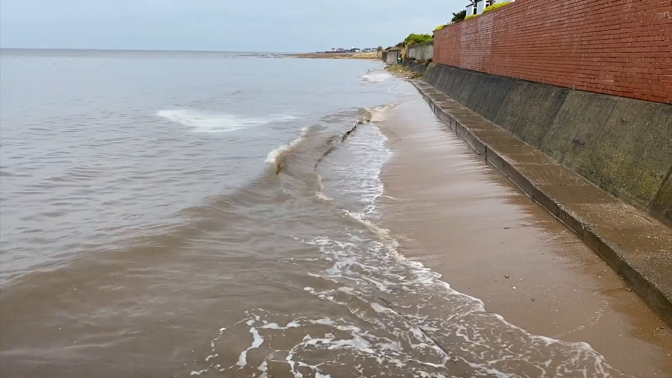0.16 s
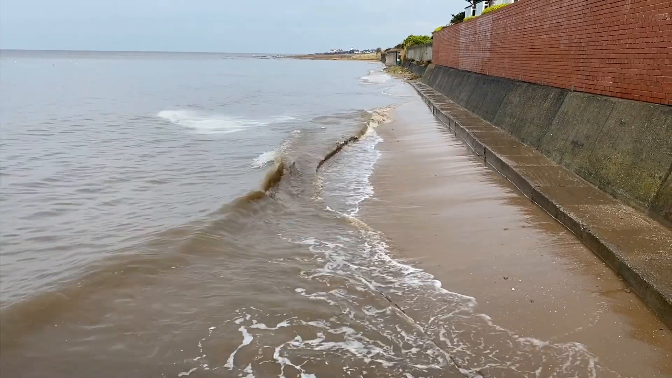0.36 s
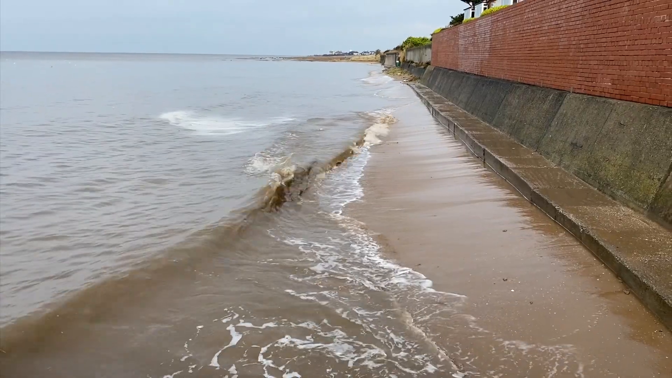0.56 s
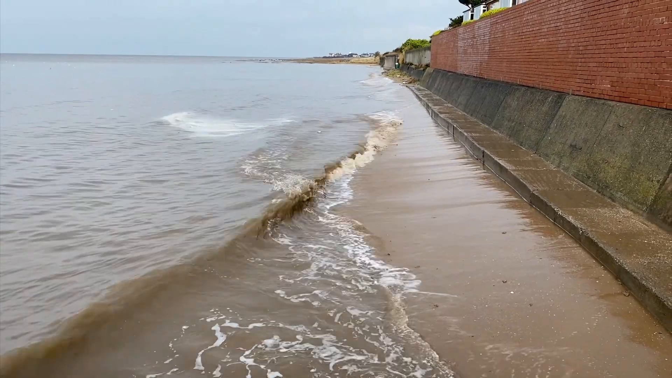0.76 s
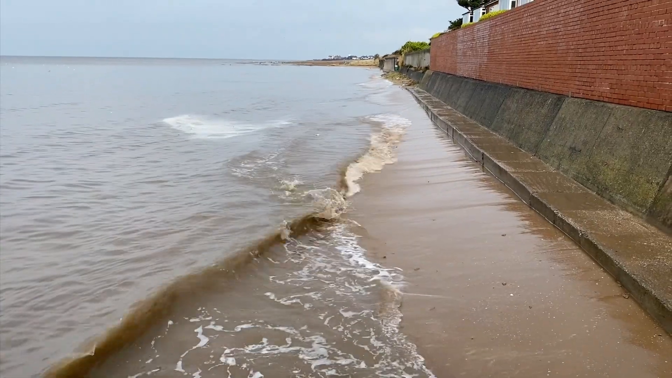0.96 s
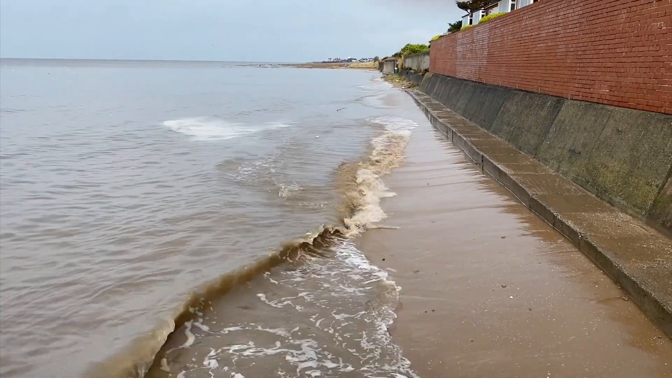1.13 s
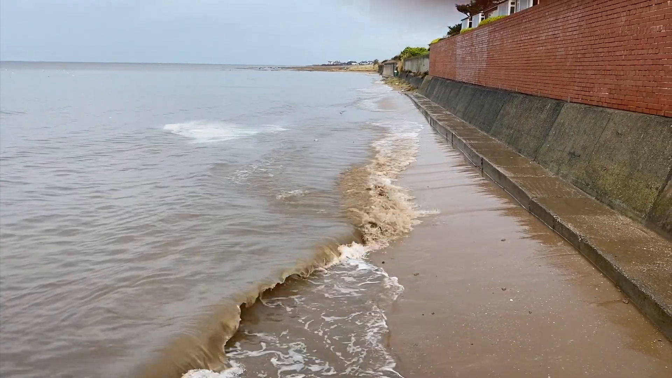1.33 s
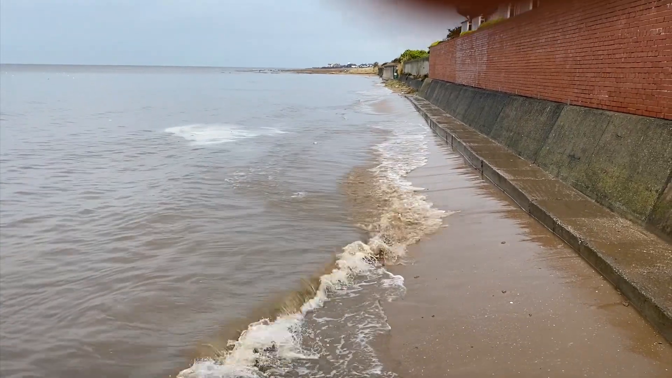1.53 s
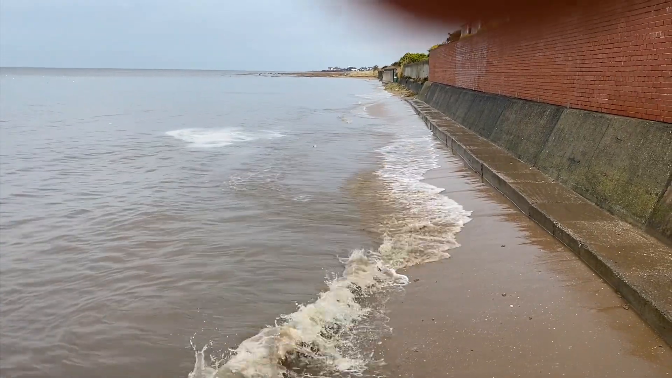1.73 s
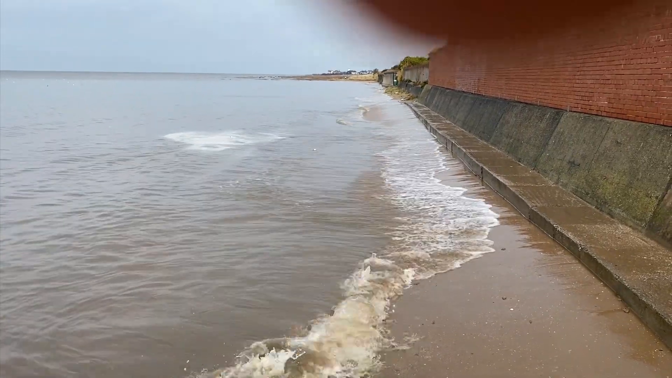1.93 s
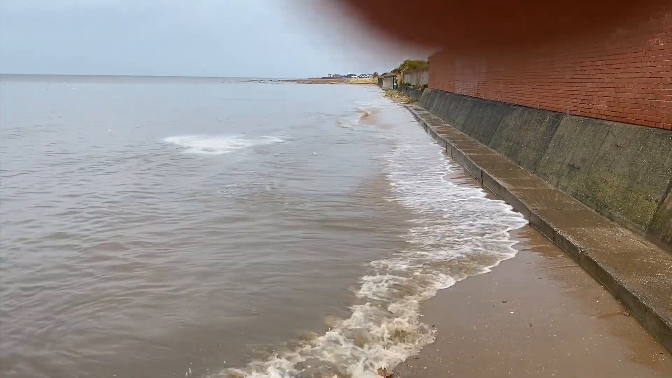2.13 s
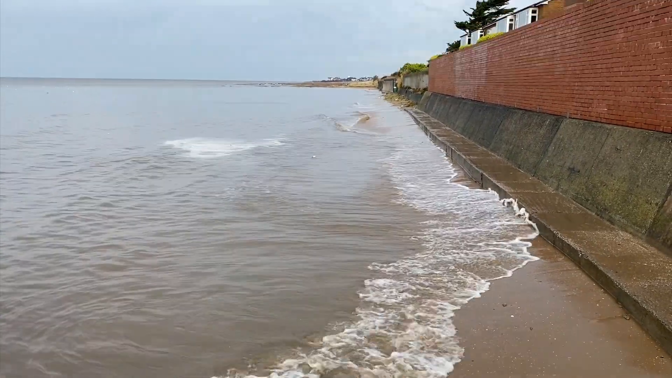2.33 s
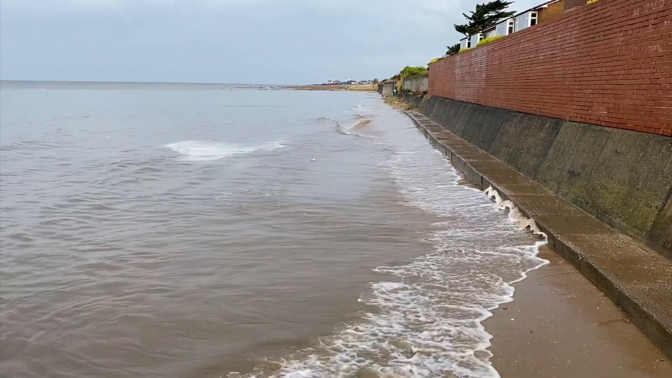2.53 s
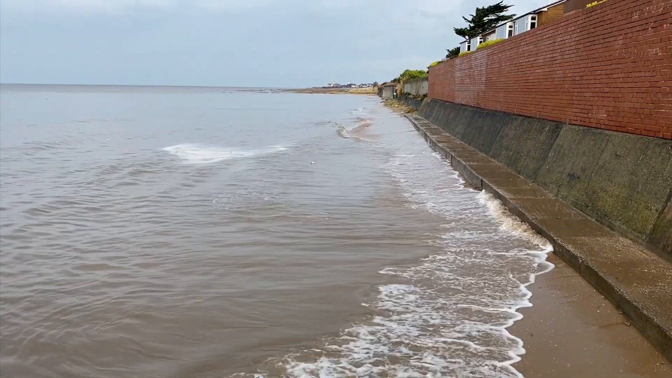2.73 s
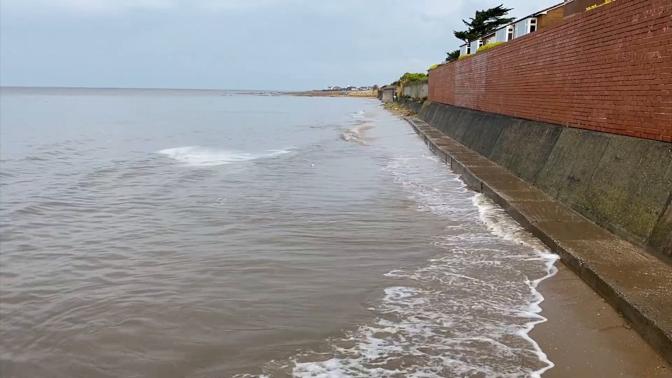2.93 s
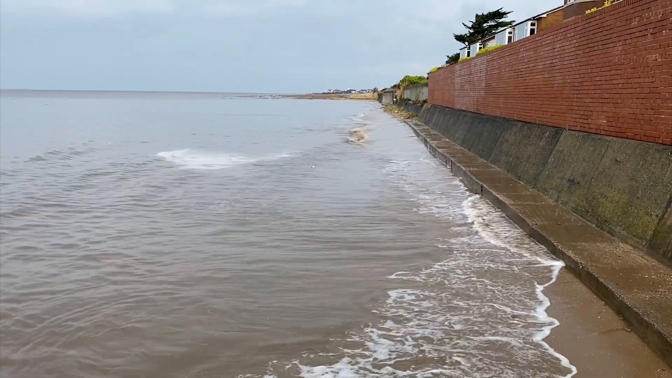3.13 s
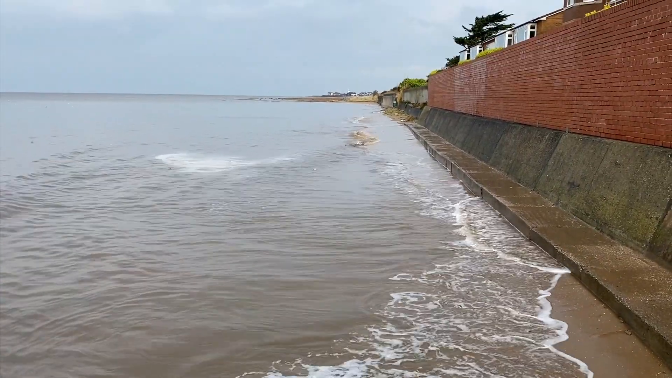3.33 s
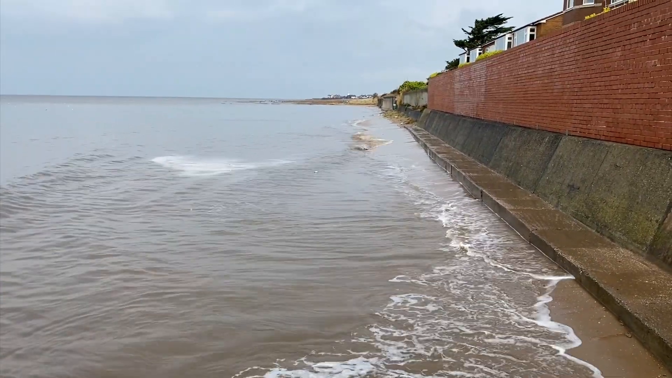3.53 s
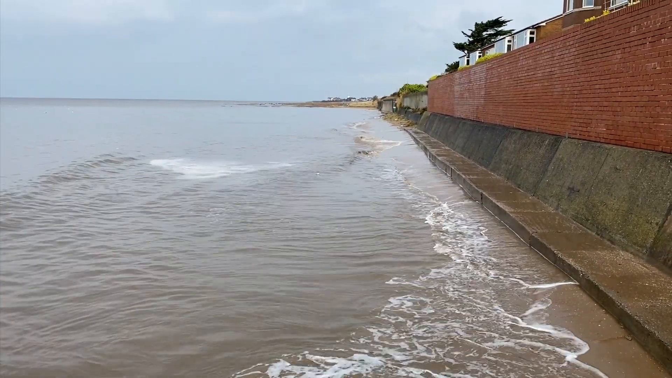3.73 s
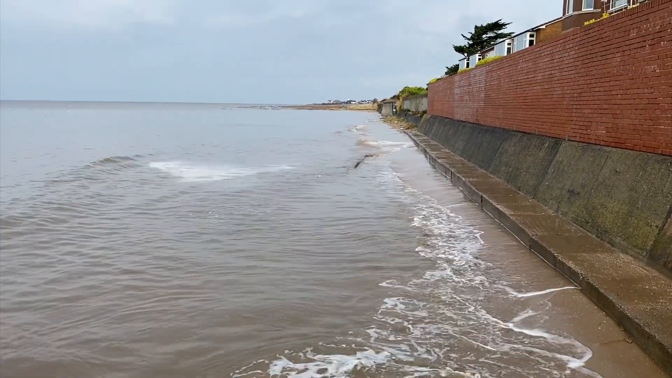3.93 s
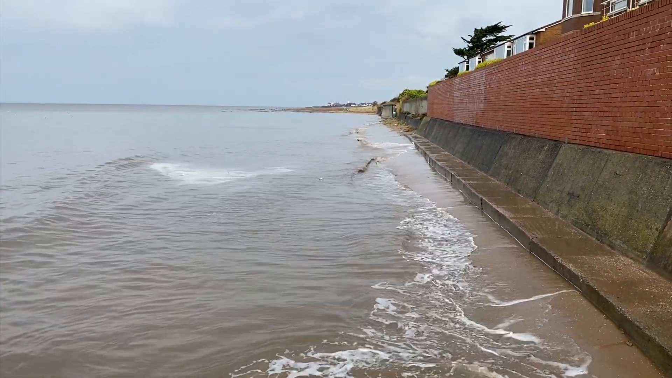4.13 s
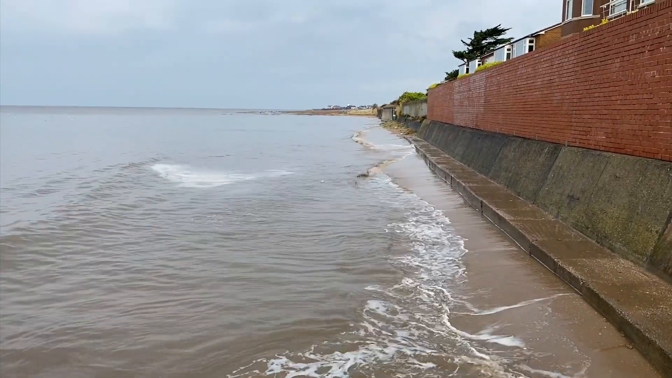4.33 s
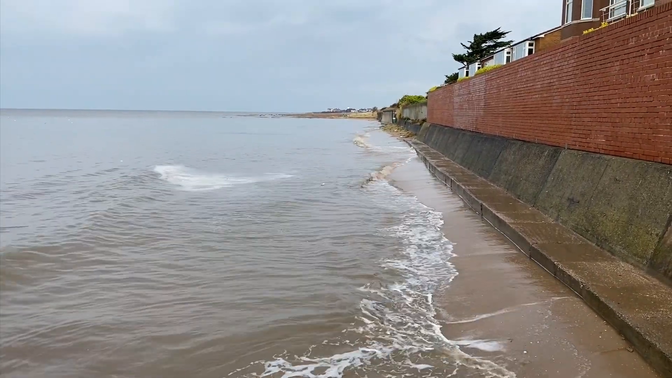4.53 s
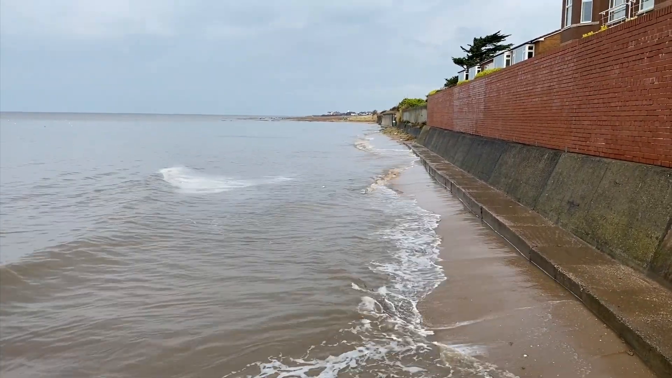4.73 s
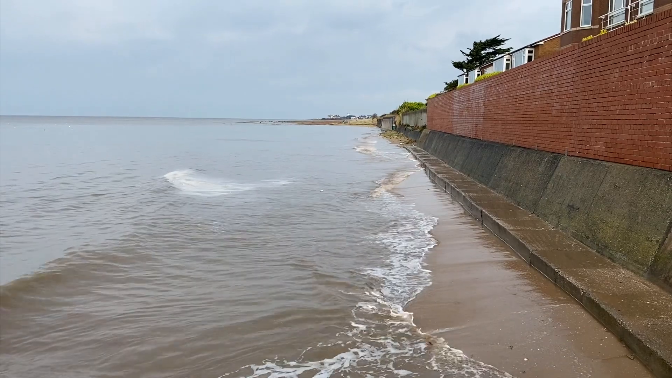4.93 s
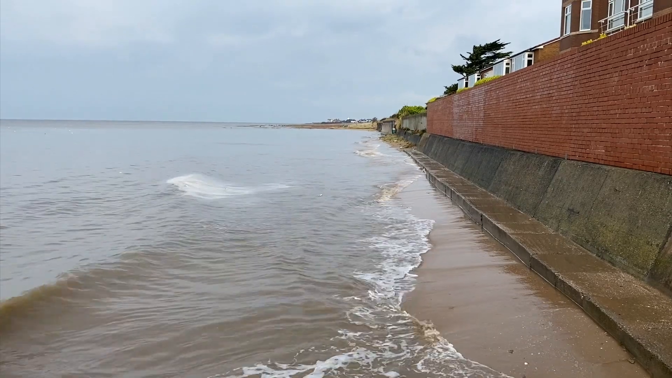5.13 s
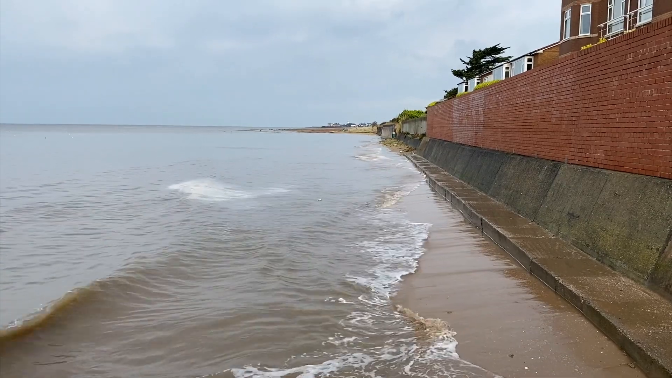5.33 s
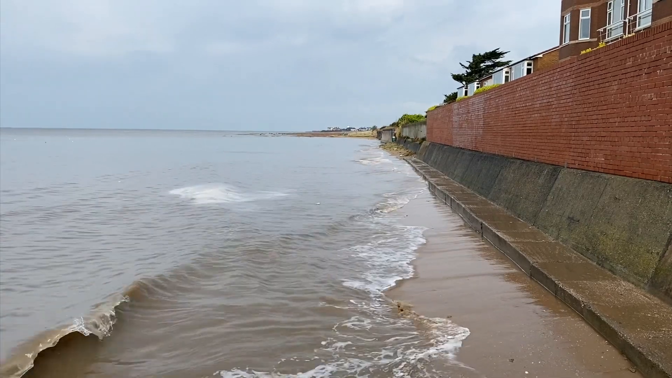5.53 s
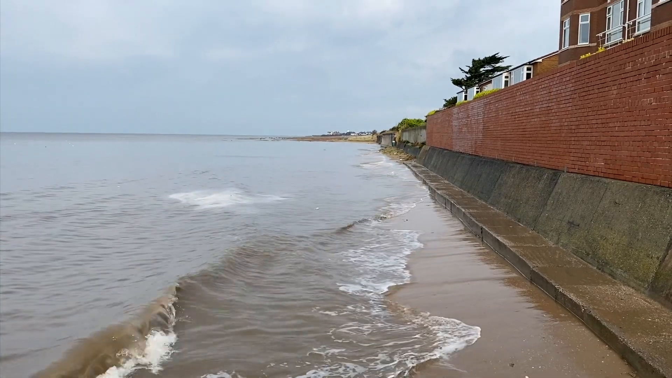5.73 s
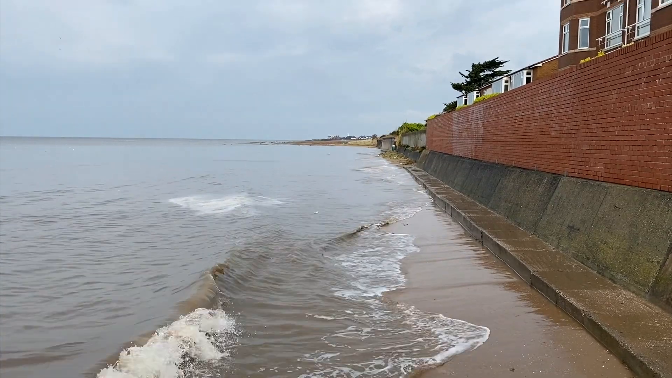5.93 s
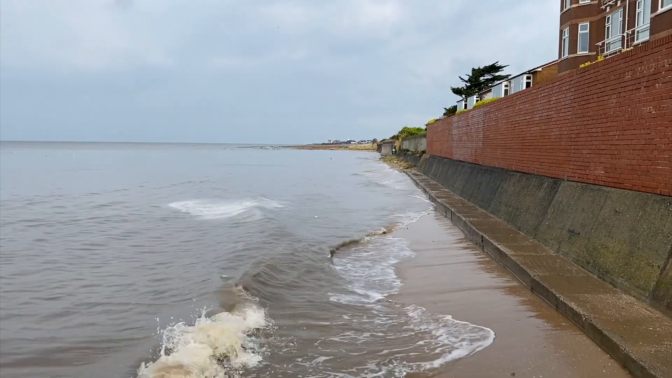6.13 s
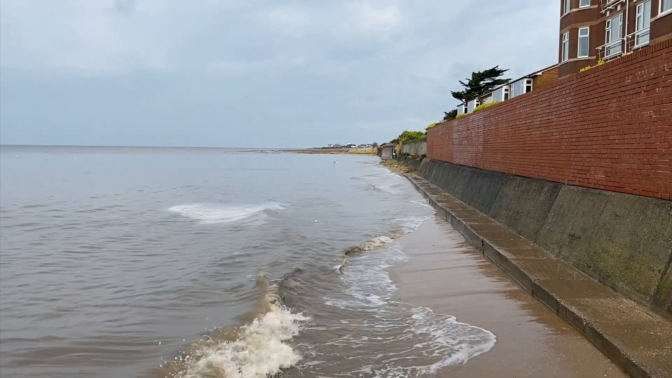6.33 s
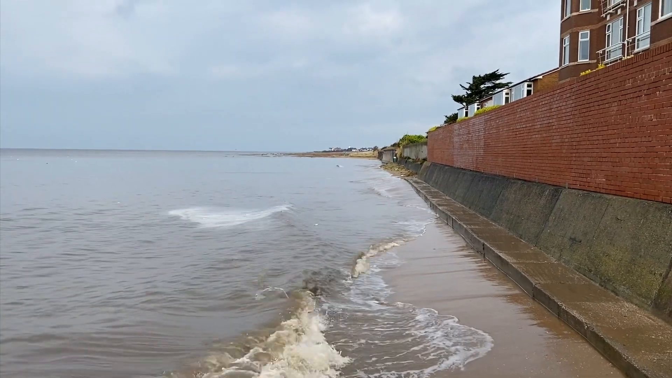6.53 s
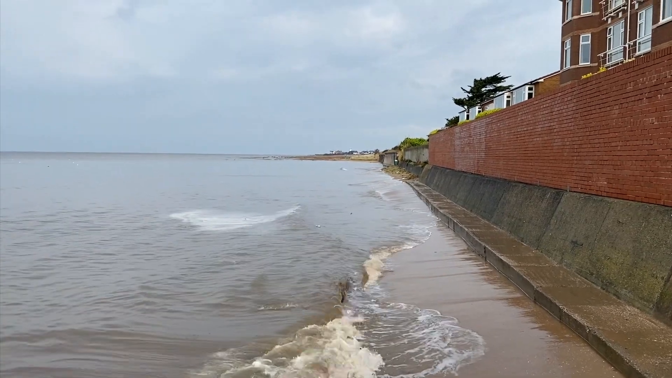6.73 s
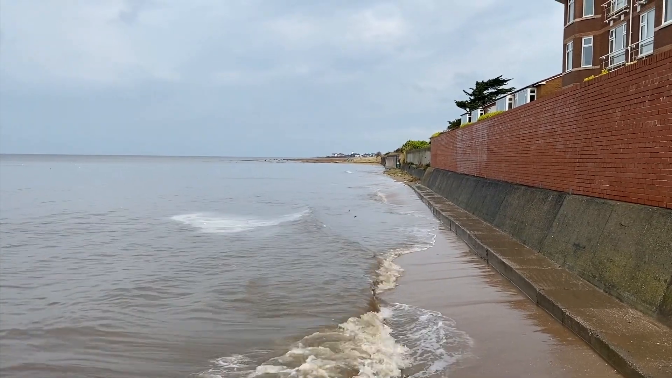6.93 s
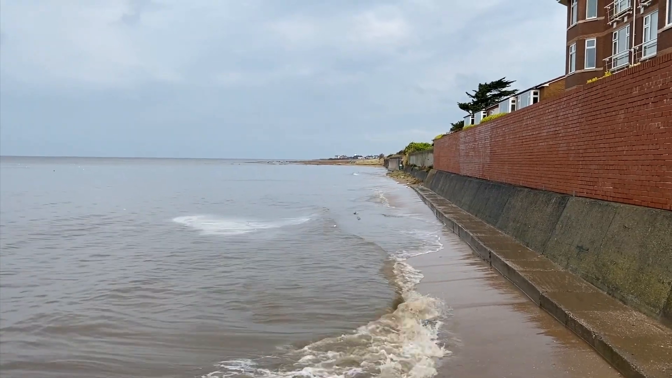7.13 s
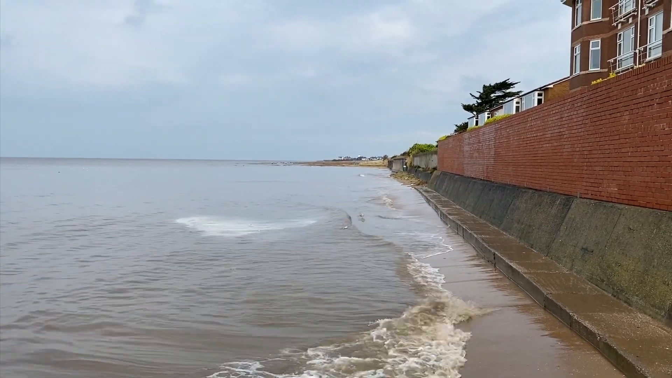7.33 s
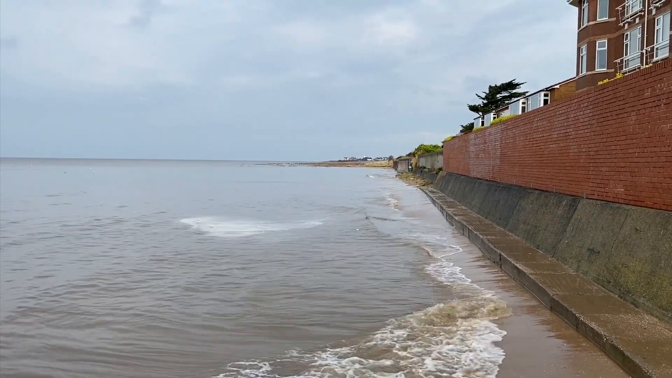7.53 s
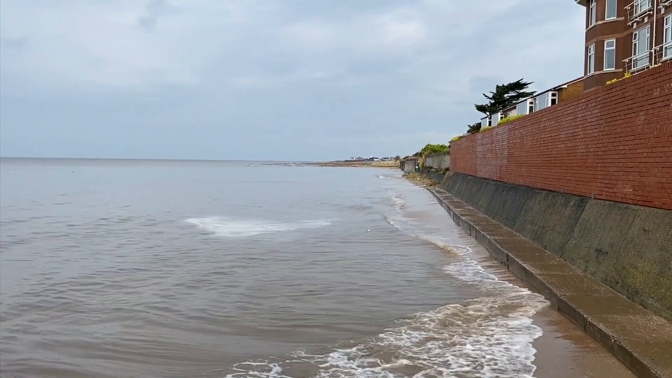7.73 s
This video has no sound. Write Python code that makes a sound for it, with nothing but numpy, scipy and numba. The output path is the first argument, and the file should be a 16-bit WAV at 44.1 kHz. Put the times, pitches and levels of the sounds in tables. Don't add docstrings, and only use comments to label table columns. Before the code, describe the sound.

Close shore waves gurgle and splash in two main surges, with a hissing, bubbling lull between them and low gusty wind buffeting.

```python
import sys
import numpy as np
from scipy import signal
from scipy.fft import rfft, irfft
from scipy.io import wavfile
from scipy.ndimage import uniform_filter1d, map_coordinates
from numba import njit

SR = 44100
rng = np.random.default_rng(int(sys.argv[2]) if len(sys.argv) > 2 else 0)


def waveform_to_disk(signal):
    frames = np.transpose(np.atleast_2d(signal))
    scaled = np.clip(frames, -1, 1) * 32767
    samples = np.round(scaled).astype(np.int16)
    wavfile.write(sys.argv[1], SR, samples)


def ratio_of_db(decibels):
    return 10 ** (np.asarray(decibels, float) / 20)


N = 347067


def on_log(table, hz):
    f, v = np.transpose(table)
    return np.interp(np.log(hz), np.log(f), v)


def walk(rate):
    hold = int(SR / rate)
    steps = np.repeat(rng.standard_normal(N // hold + 1), hold)
    return 0.91 * uniform_filter1d(uniform_filter1d(steps, hold), hold)[:N]


RISE_SHARE = 0.69


def bump(s, at, length):
    late = (s - at[:, None]) / length[:, None]
    return np.exp(-(late / np.where(late < 0, RISE_SHARE, 1)) ** 2)


def swells_db(table, octaves, hz, s):
    at, gain_db, centre, length = np.transpose(table)
    reach = gain_db[:, None] * np.exp(-(np.log2(hz / centre[:, None]) / octaves) ** 2)
    return np.sum(reach * bump(s, at, length), axis=0)


@njit
def svf(x, hz, width):
    y, b, l = np.empty(len(x)), 0., 0.
    g, k = np.tan(np.pi * hz / SR), width / hz
    for i in range(len(x)):
        v = (b + g * (x[i] - l)) / (1 + g * (g + k))
        b, l, y[i] = 2 * v - b, l + 2 * g * v, k * v
    return y


# pitch_hz, correlation_0_to_1
LIKENESS = [(60, 0.94), (200, 0.96), (640, 0.83), (1100, 0.64), (1750, 0.87), (2200, 1), (2900, 0.83),
            (4100, 0.66), (5500, 0.17), (6400, 0.76), (15000, 0.6)]


def spread(hz):
    like = np.clip(on_log(LIKENESS, hz), 0, .99)
    return np.sqrt((1 - like) / (1 + like))


def band(hz):
    width = hz * 0.3
    mid, side = (svf(svf(rng.standard_normal(N), hz, width), hz, width) for _ in range(2))
    return (mid + spread(hz) * side * np.array([[1], [-1]])) / np.std(mid)


@njit
def bubbles(start, hz, cycles, glide, left, right, length):
    out = np.zeros((2, length))
    for k in range(len(start)):
        life = cycles[k] * SR / hz[k]
        phase = 0.
        for j in range(min(int(4 * life), length - start[k])):
            age = j / life
            phase += 2 * np.pi * hz[k] * (1 + glide[k] * age) / SR
            v = 8.15 * age * np.exp(-3 * age) * np.sin(phase)
            out[0, start[k] + j] += left[k] * v
            out[1, start[k] + j] += right[k] * v
    return out


# start_s, breaking_strength_db, spray_brightness_db, left_minus_right_db
SURF = [(0, -35, -16.5, 3.5), (.5, -33.5, -22.5, 3.5), (1.03, -27.5, -18, 1.5), (1.22, -29.5, -14.5, 1.5),
        (1.38, -24.5, -16, 3.5), (2.0, -27.5, -13, 1.5), (2.48, -35, -13, 1.5), (2.85, -39, -10, 2.5),
        (3.5, -42, -10, 2), (4.1, -43, -13.5, 6), (4.25, -39.5, -12.5, 3), (4.85, -35, -19, 4),
        (5.38, -39.5, -18, 5.5), (5.63, -30.5, -11, 9.5), (6.35, -25.5, -14.5, 6), (7.03, -28, -15.5, 2),
        (7.47, -33.5, -13.5, 2.5), (7.87, -38.5, -10.5, 1.5)]
FULL_BREAK_DB, FULL_SPRAY_DB = -25, -15
# pitch_hz, level_db_per_hz
COLOUR = [(55, -23), (130, 3.5), (200, 4), (300, -2.5), (430, -4), (900, -10.5), (1250, -14), (2200, -21.5),
          (2750, -22), (4500, -26.5), (5700, -32), (6500, -28.5), (12800, -29.5), (15500, -35.5)]
# middle_hz, full_break_level_db, db_per_db_of_strength, db_per_db_of_brightness
LAYERS = [
    (170, -8, 1.5, 0.24),
    (554, -4, 1.02, -0.07),
    (1200, -4.5, 0.9466, 0.5),
    (2780, -3.5, 0.9657, 0.15),
    (9000, -4.5, 1.42, 1.49),
]
# start_s, swell_db, middle_hz, length_s
COLLAPSES = [(0.223, 7, 302, 0.037), (0.7, -4.5, 150, 0.58), (1.1, 7.5, 306, 0.042),
             (1.147, 6, 1100, 0.048), (1.402, 5.5, 224, 0.06), (1.592, 8, 170, 0.018),
             (1.7, 10, 220, 0.056), (1.805, 7.5, 170, 0.062), (2.066, 3.5, 180, 0.045),
             (2.3, 3, 200, 0.065), (2.33, -1, 210, 0.033), (2.48, 9, 383, 0.07), (2.7, 5, 300, 0.12),
             (3.26, 9.5, 290, 0.11), (3.54, 10, 327, 0.23), (3.8, 7.5, 337, 0.082), (5.02, 3, 300, .06),
             (5.14, 13, 200, 0.025), (5.57, 6, 191, 0.024), (5.72, 5, 800, 0.1), (5.8, 13.5, 170, 0.067),
             (5.81, 9, 980, 0.0091), (6.11, 3.5, 190, 0.077), (6.2, 4, 200, 0.055), (6.56, 2.5, 198, 0.23),
             (6.72, 1, 230, 0.16), (6.95, 0.5, 350, 0.1), (7.41, 5, 250, 0.015), (7.73, -5, 500, 0.04),
             (7.79, 9, 500, 0.045), (.3, 1, 400, 0.21), (.95, -3, 550, .1), (1.66, -3.5, 200, 0.12),
             (1.75, -2.5, 550, 0.12), (2.4, 3, 200, .1), (4.65, 3, 550, 0.12), (7.1, -0.5, 150, 0.14)]
COLLAPSE_OCTAVES = 1.0
# start_s, swell_db, middle_hz, length_s
SPRAYS = [(0.218, 3, 3200, .04), (0.447, 6, 8000, 0.024), (0.607, 10, 8500, 0.1), (0.738, 1.5, 3300, 0.027),
          (1.107, 6.5, 7960, 0.049), (1.305, 3, 9000, 0.08), (1.79, 4.5, 3800, 0.055),
          (1.926, 4, 2600, 0.1), (2.3, 4.5, 3800, 0.26), (2.443, 6, 9000, 0.11), (2.747, 1, 2560, .04),
          (3.06, 1, 4000, 0.056), (3.182, 0, 2500, .04), (3.35, -3, 4500, 0.025), (3.686, 6, 2500, 0.09),
          (5.553, -0.5, 2600, 0.031), (1.36, 1.5, 3450, 0.077), (4.4, 1, 4500, 0.062),
          (4.677, 2.5, 5000, .04), (5.148, 4, 3300, 0.036), (5.468, 2.5, 5000, 0.046),
          (5.692, 6, 9500, 0.013), (5.8, 6.5, 6000, 0.03), (6.212, 3.5, 7900, .05),
          (6.997, 2.5, 4500, 0.094), (7.803, 6.5, 4500, 0.052), (6.6, 0.5, 3000, 0.55),
          (5.545, 0.5, 6500, 0.035), (1.6, -5, 955, 0.32), (3.45, -2, 1800, .2)]
SPRAY_OCTAVES, FINE_SPREAD = 0.94, 0.8
# start_s, swell_db, middle_hz, length_s
PATCHES = [(1.14, 6, 3050, 0.12), (1.1, 4, 1300, 0.072), (1.58, 6, 1010, 0.4), (2.46, 8, 1230, 0.092),
           (2.6, 2, 3000, 0.25), (3.55, 5.5, 1030, .25), (3.6, -5, 1230, .4), (4.55, 5, 1000, .12),
           (5.5, 2, 1200, 0.1), (5.14, 8, 3000, .025), (5.1, -6, 1230, 0.078), (5.62, 8, 2000, 0.1),
           (4.6, -11, 1040, 0.21), (6.2, 0.5, 2100, 0.16), (7.4, 0.5, 3500, 0.63), (6.7, 1.5, 1000, 0.39),
           (7.44, 4.5, 2300, 0.38), (5.54, -21, 1140, 0.07), (5.6, -9, 1450, .05), (5.46, -6, 2800, 0.076),
           (2.44, 7.5, 1730, 0.11), (1.65, 1.5, 4300, 0.7), (6.66, 1.5, 2800, .3), (6.1, 4, 400, .1),
           (1.1, 4, 530, .08), (1.81, 7, 560, 0.2), (5.58, 4, 6100, 0.091), (5.16, 5.5, 390, .05),
           (6.1, -10, 400, 0.091), (7.8, -6, 420, 0.12), (2.72, 8.5, 1670, 0.072)]
PATCH_OCTAVES = 0.24
# pitch_hz, left_minus_right_db
LEAN = [(60, 0.5), (300, 1.5), (800, 5), (1450, 2), (2300, 4), (3200, 5), (4200, 3), (5000, 4.5), (6400, 1),
        (16000, -0.5)]
# start_s, comb_depth_db
BOUNCE = [(0, -3), (1.0, -2), (2.0, 0), (2.4, -0.5), (2.9, -3), (3.5, -3), (4.4, -2), (5.1, -3.5),
          (5.4, -1), (5.58, 5.5), (5.75, 1.5), (6.1, 2.5), (6.8, 1.5), (7.3, -2), (7.87, 0)]
BOUNCE_HZ = 2800


def surf_db(hz, s):
    times, strength, bright, pan = np.transpose(SURF)
    full_db, follow, shine = (on_log(np.array(LAYERS)[:, [0, k]], hz) for k in (1, 2, 3))
    swell = full_db + follow * (np.interp(s, times, strength) - FULL_BREAK_DB)
    swell = swell + shine * (np.interp(s, times, bright) - FULL_SPRAY_DB)
    spray_octaves = SPRAY_OCTAVES * (np.array(SPRAYS)[:, 2:3] / 4000) ** FINE_SPREAD
    swell = swell + swells_db(COLLAPSES, COLLAPSE_OCTAVES, hz, s)
    swell = swell + swells_db(SPRAYS, spray_octaves, hz, s)
    swell = swell + swells_db(PATCHES, PATCH_OCTAVES, hz, s)
    lean = on_log(LEAN, hz) * (1 + 0.2 * (np.interp(s, times, pan) - pan.mean()))
    comb = np.cos(2 * np.pi * hz / BOUNCE_HZ) * np.exp(-(np.log(hz / 1900) / 0.72) ** 2)
    swell = swell + comb * np.interp(s, *np.transpose(BOUNCE))
    return on_log(COLOUR, hz) + 10 * np.log10(hz) + swell, lean


# pitch_hz, level_db_per_hz
FAR_SEA = [(150, -19), (260, -1), (400, -3), (560, -16), (1000, -43), (1800, -17), (3000, -39),
           (5700, -30.5), (7000, -24), (11000, -25), (16000, -30)]


def roar():
    out, s = 0, np.arange(N) / SR
    surge, group = walk(45), walk(55)
    for hz in 50 * 2 ** np.arange(0, 8.4, 1 / 4):
        group = 0.937 * group + 0.5 * walk(50)
        db, lean = (np.interp(s, s[::128], curve) for curve in surf_db(hz, s[::128]))
        own_db = np.interp(np.log(hz), np.log([150, 400, 3000]), [1.8, 1.3, .8]) * walk(22)
        far = ratio_of_db(on_log(FAR_SEA, hz) + 10 * np.log10(hz) - 25.5)
        near = ratio_of_db(db + 0.87 * surge + 0.59 * group + own_db)
        out = out + np.hypot(near, far) * ratio_of_db(np.array([lean, -lean]) / 2) * band(hz)
    return ratio_of_db(-51) * out


def foam(count):
    when, size, life, place, rise, loud = rng.random((count, 6)).T
    share = np.sqrt(size)
    hz = 130 * 100 ** share
    cycles = 2.26 + (4.4 + 9.8 * share) * life ** 2
    db, lean = surf_db(hz, when * N / SR)
    stand_db = np.minimum(-(3.04 + 1.8 * share) * np.log(loud + 1e-9), 10 + 4 * share)
    gain = ratio_of_db(db + stand_db) * np.sqrt(hz / 1000 / (share + 0.076))
    side = np.sqrt(3) * (2 * place - 1) * spread(hz)
    left = gain * ratio_of_db(lean / 2) * (1 + side)
    right = gain * ratio_of_db(-lean / 2) * (1 - side)
    return ratio_of_db(-57.5) * bubbles((when * N).astype(np.int64), hz, cycles, 0.078 * rise, left, right, N)


# start_s, extra_path_ms, strength_0_to_1
WALL = [(0, 2.74, 0.22), (1.0, 2.18, 0.26), (2.0, 2.16, 0.16), (2.7, 2.4, 0), (3.1, 2.9, 0.24),
        (4.2, 2.73, 0.4), (5.3, 2.8, 0.1), (5.5, 2.1, 0), (6.3, 2.1, 0.19), (6.8, 2.2, 0.11),
        (7.87, 2.45, 0.1)]
WALL_HZ = 1560


def wall(x):
    times, late_ms, share = np.transpose(WALL)
    s = np.arange(N) / SR
    place = (s - np.interp(s, times, late_ms) / 1000) * SR
    share = np.clip(np.interp(s, times, share), 0, .9)
    dull = signal.sosfiltfilt(signal.butter(1, WALL_HZ, fs=SR, output="sos"), x)
    echo = np.array([map_coordinates(c, [place], order=1, mode="mirror") for c in dull])
    return x + share * echo - (1 - 1 / np.sqrt(1 + share ** 2)) * dull


# start_s, level_db
GUSTS = [(0, -48), (.5, -42), (.9, -36.5), (1.5, -31.5), (1.9, -32), (2.25, -40), (2.9, -53), (3.1, -36.5),
         (4.2, -36.5), (5.2, -33.5), (5.35, -43.5), (5.7, -53), (5.85, -32), (6.5, -30), (6.8, -38),
         (7.3, -32.5), (7.87, -40)]
# start_s, peak_db, length_s
BUFFETS = [(0.496, -51, 0.035), (0.752, -30, 0.056), (1.11, -18.5, 0.017), (1.42, -34, .04),
           (1.578, -24, .04), (1.667, -15, 0.017), (1.74, -22, 0.044), (1.868, -30, 0.043),
           (2.14, -31, 0.028), (2.536, -35, 0.033), (2.705, -36, 0.055), (2.87, -44, 0.024),
           (3.054, -41, 0.14), (3.838, -29, 0.044), (3.975, -42, .02), (4.055, -38, 0.025),
           (4.396, -41, 0.035), (4.575, -44, .05), (4.795, -37, 0.059), (5.137, -29, 0.022),
           (5.818, -24, 0.09), (6.04, -23, 0.047), (6.12, -19, 0.032), (6.32, -32, 0.13), (6.48, -24, 0.09),
           (6.72, -45, .03), (7.2, -29, 0.035), (7.287, -40, 0.027), (7.663, -27, 0.032),
           (7.802, -36, 0.051)]
# pitch_hz, level_db_per_third_octave
WIND = [(25, -44), (40, -27), (55, -4.5), (75, -2.5), (110, -4), (160, -12.5), (260, -22)]


def wind():
    s = np.arange(N) / SR
    at, peak_db, length = np.transpose(BUFFETS)
    push = ratio_of_db(np.interp(s, *np.transpose(GUSTS))) + ratio_of_db(peak_db) @ bump(s, at, length)
    out = 0
    for hz in 28 * 2 ** np.arange(0, 3.4, 1 / 4):
        out = out + ratio_of_db(on_log(WIND, hz) + 2.0 * walk(12)) * band(hz)
    return push * ratio_of_db(np.array([[.6], [-.6]]) - 7.5) * out


def struck(table, db, glide):
    s, peak_db, hz, pan_db, cycles = np.transpose(table)
    left, right = ratio_of_db(peak_db + db + pan_db / 2), ratio_of_db(peak_db + db - pan_db / 2)
    start = (s * SR).astype(np.int64)
    return bubbles(start, hz, np.clip(cycles, .5, 20), glide + 0 * s, left, right, N)


def pockets(table, db):
    s, peak_db, hz, cycles = np.transpose(table)
    lean = surf_db(hz, s)[1]
    return struck(np.transpose([s, peak_db, hz, lean, cycles]), db=db, glide=0.051)


# start_s, peak_db, pitch_hz, ring_cycles
MORE_PLOPS = [(0.065, -30, 447, 4), (0.361, -26, 370, 5.4), (0.596, -16, 347, 3.3), (0.884, -19, 337, 6),
              (0.947, -28, 475, 4.7), (1.119, -13, 503, 7.2), (1.271, -25, 370, 4), (1.519, -12, 583, 4.7),
              (1.582, -9, 177, 3.5), (1.659, -16, 240, 3.8), (1.759, -7.5, 151, 2.7), (1.849, -9, 247, 3.3),
              (2.478, -8, 420, 1.5), (2.489, -10, 330, 2.1), (2.993, -30, 283, 4), (3.13, -24, 272, 5.4),
              (3.199, -26, 291, 4), (3.237, -21.5, 403, 4), (3.413, -33, 339, 4), (3.631, -20, 331, 4.4),
              (3.769, -26, 460, 5.4), (4.243, -39, 345, 4), (4.599, -23, 426, 5.3), (4.689, -27, 371, 3.7),
              (4.88, -23, 382, 4), (5.426, -29, 336, 4), (5.452, -21, 258, 3.9), (5.768, -8, 207, 2),
              (5.997, -17, 514, 4), (6.054, -17, 213, 3.1), (6.453, -10, 226, 3.7), (6.503, -23, 191, 3.6),
              (6.58, -9, 187, 2.9), (6.645, -10, 243, 4), (7.275, -21, 158, 3.5), (7.466, -18, 480, 4),
              (7.462, -28, 183, 4.1), (7.795, -17, 420, 5), (7.776, -19, 720, 5)]


def more_plops():
    return pockets(MORE_PLOPS, db=-7.0)


# start_s, peak_db, pitch_hz, left_minus_right_db
DROPS = [(0.1594, -32, 2160, 3.5), (0.43, -36, 1930, 3.0), (0.5694, -31, 1930, 6), (1.2994, -18, 2790, 6),
         (1.34, -27, 1810, 2), (2.5935, -24, 3170, 4), (2.7611, -27, 2450, 5), (2.876, -29, 3500, 5),
         (3.14, -30, 3370, 5), (3.084, -30, 1990, 2.5), (3.1647, -26, 2600, 2), (3.27, -30, 4000, 1),
         (3.3508, -31, 4220, 1.5), (4.36, -30, 2550, 2.5), (3.6994, -30, 2120, 0), (3.7324, -30, 2010, 2),
         (3.7529, -30, 4270, 2.5), (3.9804, -29.5, 2130, 2.0), (4.1445, -36, 2220, 2.0),
         (4.2213, -27, 2200, 7), (4.2595, -23, 2390, 7), (4.3949, -32, 2330, 1), (4.42, -31, 2040, 1),
         (5.1263, -28, 3380, 7.0), (5.1422, -25.5, 3120, 10), (5.2094, -30, 3400, 4.0),
         (5.7059, -14.5, 2200, 5), (5.8074, -17, 2900, 6), (7.034, -25, 2340, 4)]
DROP_CYCLES = 6.4


def drops(count):
    table = np.c_[DROPS, np.full(len(DROPS), DROP_CYCLES)]
    ladder = np.repeat(table, count, axis=0)
    late, weak, size = rng.random((len(ladder), 3)).T
    rung = (np.arange(len(ladder)) % count + size) / count
    octaves_off = abs(np.log2(1600 * 6 ** rung / ladder[:, 2]))
    ladder[:, 0] += .007 * late ** 2
    ladder[:, 1] -= 4 * weak + 5 * rung + 4 * octaves_off
    ladder[:, 2] = 1600 * 6.46 ** rung
    ladder[:, 4] *= ladder[:, 2] / 2600
    return struck(table, db=-8, glide=.08) + struck(ladder, db=-11, glide=.05)


# start_s, peak_db
CRACKS = [(0.428, -27), (0.7272, -27), (1.0789, -30), (1.3359, -14), (2.3236, -30), (2.5082, -28),
          (2.6958, -24), (3.072, -24), (4.2598, -25), (5.5238, -32), (5.705, -10), (5.7987, -22),
          (5.835, -17), (7.0354, -26)]
CRACK_S, CRACK_HZ = 0.0026, 3000


def cracks():
    at, peak_db = np.transpose(CRACKS)
    late = (np.arange(N) / SR - at[:, None]) / CRACK_S
    decay = np.exp(-np.abs(late)) * (late > 0)
    burst = ratio_of_db(peak_db - 7) @ decay * rng.standard_normal(N)
    return signal.sosfilt(signal.butter(1, CRACK_HZ, "high", fs=SR, output="sos"), burst)


# start_s, peak_db, pitch_hz, ring_cycles
PLOPS = [(0.653, -12, 596, 4.2), (1.08, -11, 449, 10), (1.108, -25, 77, 1.3), (1.39, -2, 218, 1.9),
         (1.45, -12, 365, 4.3), (1.798, -4, 225, 3.7), (1.939, -10, 260, 3.7), (2.505, -18, 366, 5),
         (2.666, -21, 182, 6.4), (3.829, -24, 65.6, 4.3), (5.124, -8, 125, 4), (5.188, -12, 112, 2.7),
         (5.531, -10.5, 587, 4.8), (5.55, -11.5, 240, 3.8), (5.599, -14, 480, 3), (5.659, -23, 860, 3.6),
         (5.688, -9.5, 580, 5.8), (5.709, -10, 780, 4.8), (5.765, -19, 920, 7.2), (5.762, -10.5, 76, 4.5),
         (5.798, -14.5, 144, 4.4), (6.107, -18, 149, 2), (6.151, -1, 184, 1.7), (6.393, -14, 230, 3),
         (6.588, -9.5, 91, 3.7), (6.932, -10, 412, 6.4), (7.402, -11, 460, 5), (7.609, -15, 63.4, 0.9),
         (7.654, -12, 130, 1.5), (5.803, -9, 774, 7), (5.664, -17, 1200, 7), (5.736, -18, 1300, 6),
         (4.257, -30, 900, 3.3)]


def plops():
    return pockets(PLOPS, db=-7.0)


# start_s, peak_db, pitch_hz, ring_cycles
CLUCKS = [(0.746, -25, 840, 5), (0.957, -25, 850, 5), (1.094, -14, 974, 5.5), (1.338, -11, 1220, 3.5),
          (1.361, -16, 720, 5.4), (1.424, -17, 955, 5), (1.556, -14, 890, 6), (1.587, -14, 905, 6),
          (1.771, -16, 735, 5), (1.82, -16, 907, 5.8), (1.89, -8.5, 953, 3.4), (1.98, -13, 929, 3.7),
          (2.073, -18, 726, 5), (2.186, -20, 716, 5), (2.34, -16, 1310, 5.4), (2.38, -19, 724, 5.7),
          (2.743, -21, 760, 4.4), (3.723, -23, 929, 6.7), (2.746, -20, 1110, 3.3), (5.666, -17, 821, 5),
          (5.739, -18, 703, 5.5), (6.191, -28, 790, 5.5), (6.379, -19, 910, 5), (6.405, -23, 708, 5),
          (6.54, -17, 850, 5), (6.768, -20, 934, 5), (6.843, -25, 937, 5), (6.925, -16, 750, 5.7),
          (7.015, -21, 960, 5)]


def clucks():
    return pockets(CLUCKS, db=-8)


def scene():
    surf = wall(roar() + foam(count=9000))
    single = more_plops() + drops(count=10) + plops() + clucks()
    return surf + wind() + single + cracks()


def empty_gaps(x, gaps):
    hz, s, z = signal.stft(x, SR, nperseg=2048)
    for lo, hi, low_hz, high_hz in gaps:
        low, high = np.round(rng.standard_normal((len(s), 2)).T)
        below = hz[:, None] < lo + low_hz * low
        above = hz[:, None] > hi - high_hz * np.maximum(high, 0)
        z = z * (below | above)
    return signal.istft(z, SR, nperseg=2048)[1][:N]


def top_cut(x):
    return signal.sosfilt(signal.butter(12, 16960, fs=SR, output="sos"), x)


# pitch_hz, left_lead_radians
LEAD = [(0, 0), (750, .55), (1100, .8), (1750, .3), (2200, 1.2), (2900, 1.05), (3900, .05), (6000, .2),
        (6900, 0), (9000, -3.14), (11200, -6.28), (13300, -9.42), (15500, -12.57), (17000, -14.7)]
RUMBLE_CUT_HZ = 37


def record(dry):
    cut = signal.butter(2, RUMBLE_CUT_HZ, "high", fs=SR, output="sos")
    turn = np.exp(.5j * np.interp(np.fft.rfftfreq(N, 1 / SR), *np.transpose(LEAD)))
    ports = irfft(rfft(signal.sosfilt(cut, dry)) * [turn, 1 / turn], N)
    return top_cut(ports)


dry = scene()
out = record(dry)
waveform_to_disk(out)
```